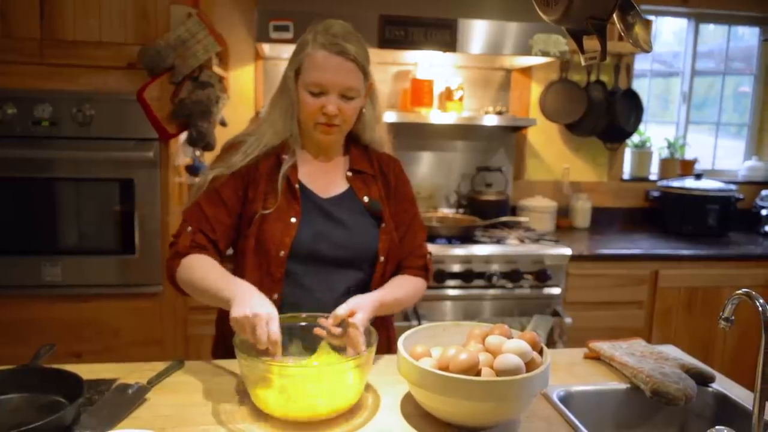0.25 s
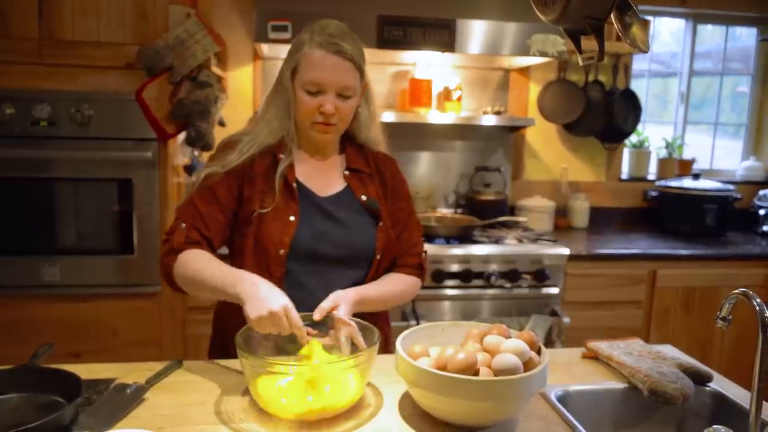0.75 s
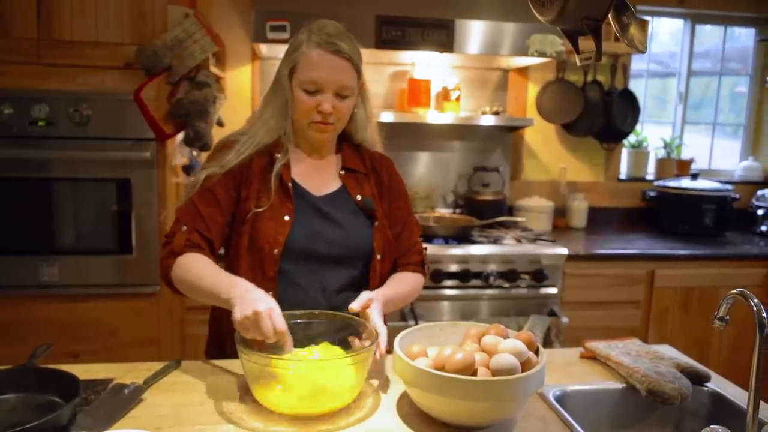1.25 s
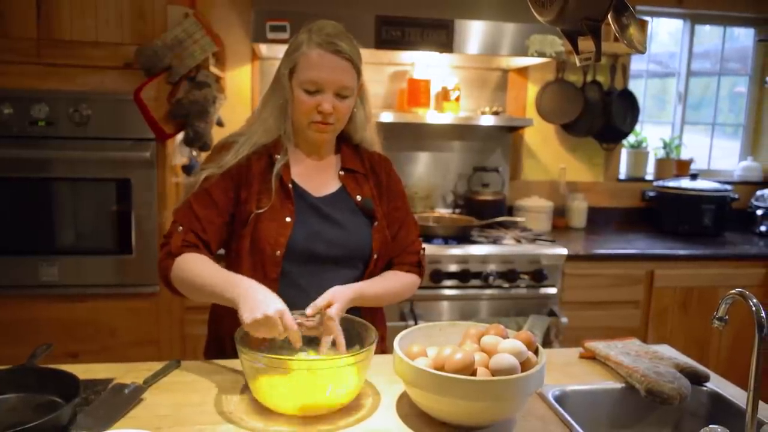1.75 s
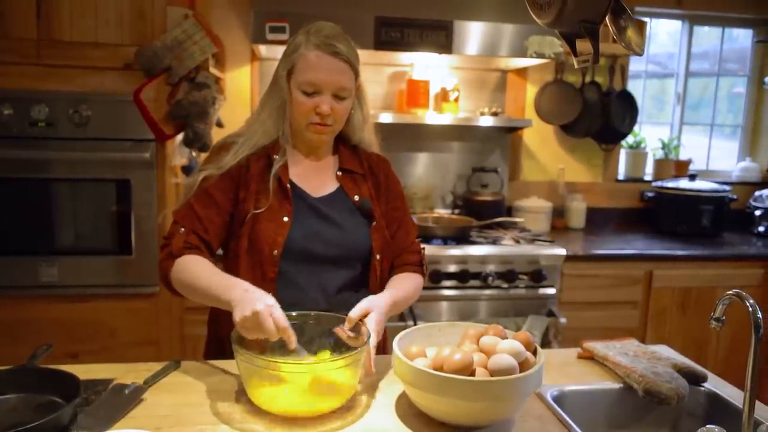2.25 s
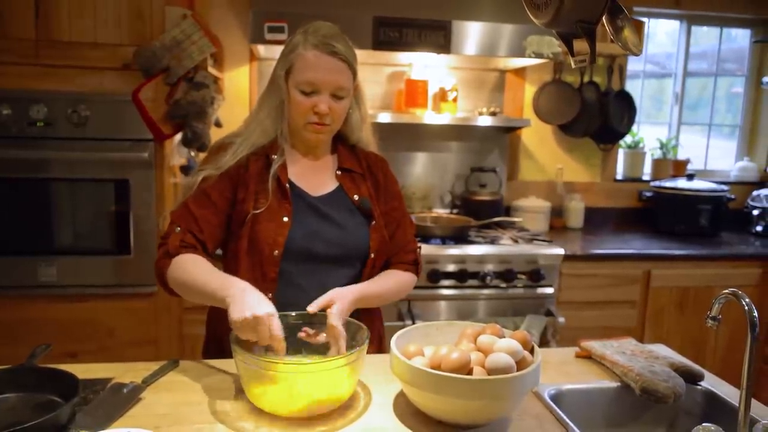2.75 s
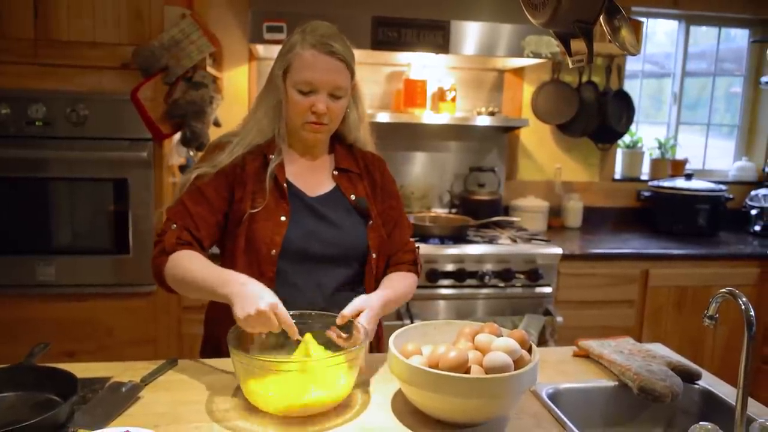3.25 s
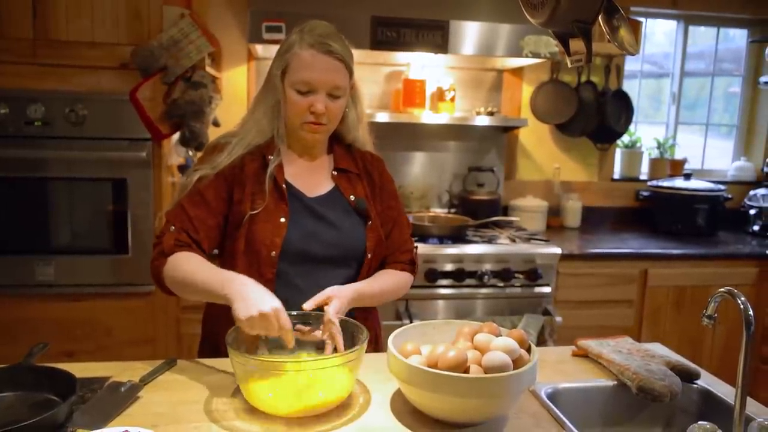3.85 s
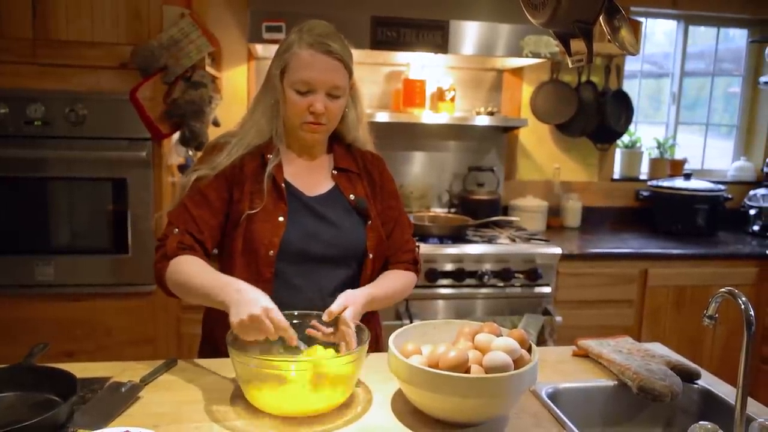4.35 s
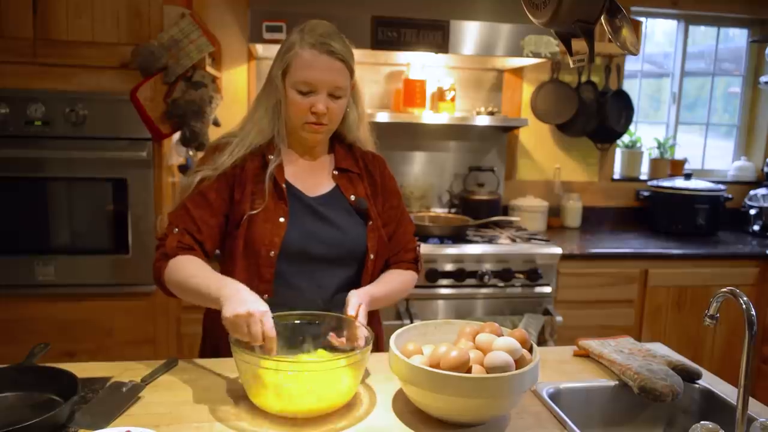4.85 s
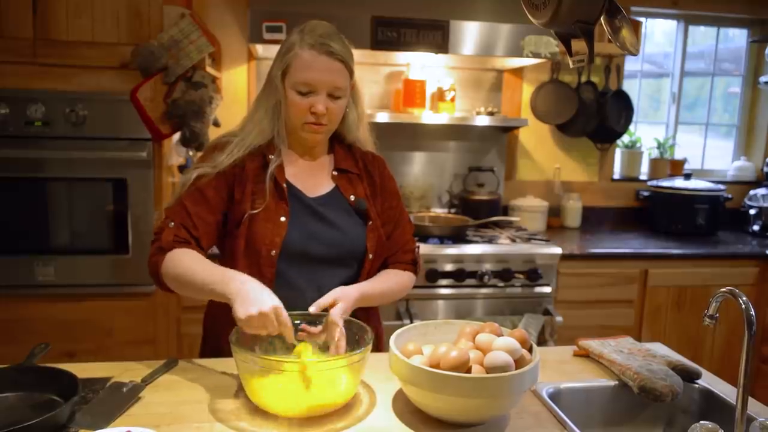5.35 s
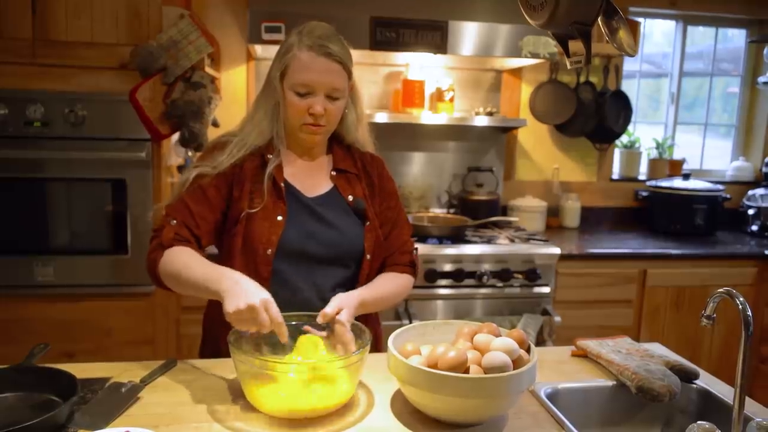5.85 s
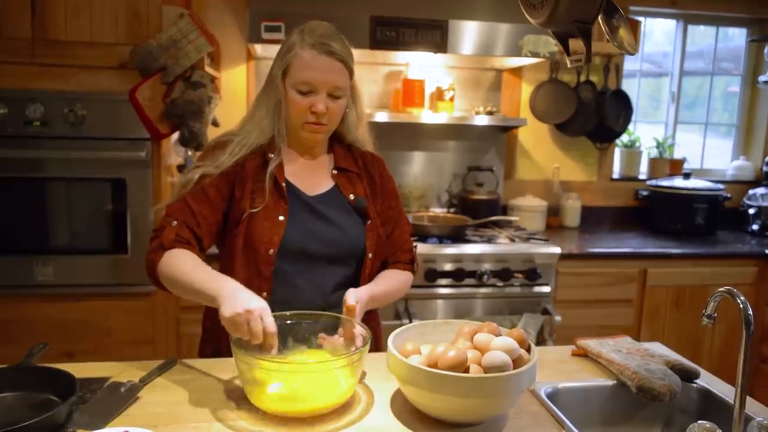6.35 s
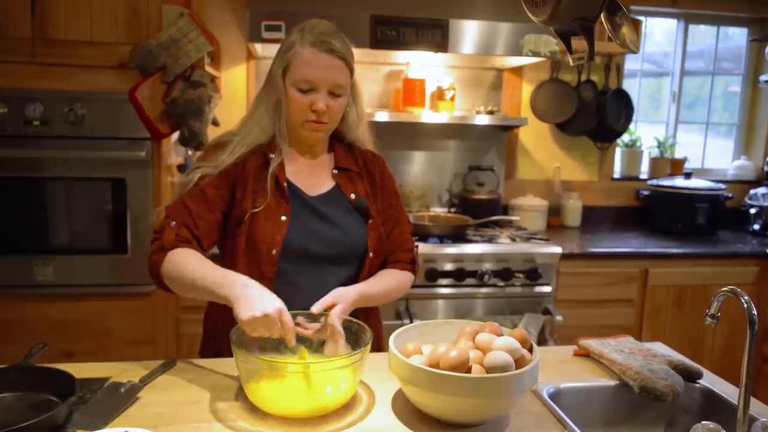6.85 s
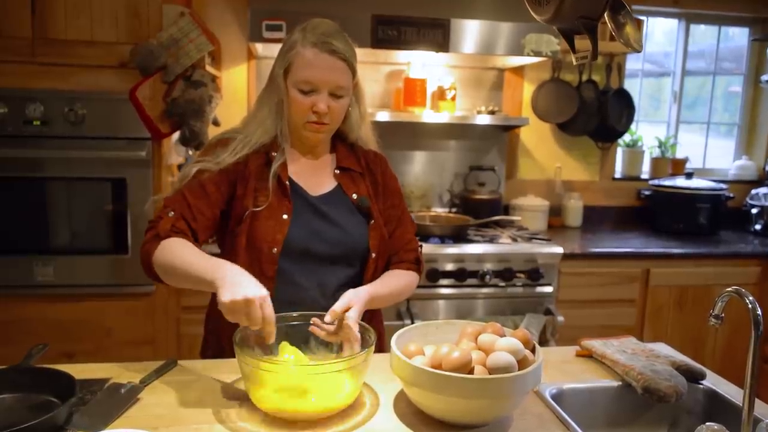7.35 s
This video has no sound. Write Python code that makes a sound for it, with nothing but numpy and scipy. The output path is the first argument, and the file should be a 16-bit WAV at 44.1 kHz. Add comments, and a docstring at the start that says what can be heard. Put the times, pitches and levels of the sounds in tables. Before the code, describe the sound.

Brisk whisking of eggs with a fork: bright ragged clicks on glass, dull knocks and squelching bubbles in a small quiet kitchen.

```python
"""The sound opens mid-beating, on the fading ring and slosh of a stroke just past; then a fork beats raw eggs
in a glass bowl, nearly five strokes a second, each a ragged rake, a click on the glass and a duller knock
through the egg. Impacts and slips excite damped modes of the bowl; the plops, squelches, gulps and gurgle of
the egg are dying bubble tones, some with bursts of noise. Echoes in the bowl and a small kitchen answer over
quiet air."""
import sys
import numpy as np
from scipy import signal
from scipy.io import wavfile
from scipy.ndimage import uniform_filter1d

SR = 44100
rng = np.random.default_rng(int(sys.argv[2]) if len(sys.argv) > 2 else 0)


def wav_record(signal):
    """Record a signal, one row per channel, as 16-bit PCM in the file named by sys.argv[1]."""
    frames = np.transpose(np.atleast_2d(signal))
    bounded = np.clip(frames, -1, 1)
    # unit amplitude maps onto the largest positive 16-bit level
    quanta = np.round(bounded * 32767).astype(np.int16)
    wavfile.write(sys.argv[1], SR, quanta)


N = 334719

# Event levels are relative: the source functions and the scene apply further gains.
# Turns of the fork: (time of click [s], click level [dB], level of its wet body [dB],
#                     delay of knock after click [s], knock level [dB])
STROKES = [(0.1265, -14.5, -26, 0.069, -21), (0.337, -17.5, -23, 0.066, -24.5),
           (0.52, -12.5, -24, 0.12, -30), (0.7503, -15, -24, 0.066, -20), (0.961, -17, -30, 0.073, -29),
           (1.137, -10.5, -27.5, 0.12, -33), (1.3815, -11, -33, 0.053, -21.5),
           (1.586, -26, -28, 0.064, -30), (1.79, -19.5, -28, 0.056, -26.5),
           (1.9756, -17.5, -26.5, 0.071, -26.5), (2.183, -16.5, -24.5, 0.07, -22.5),
           (2.398, -17, -20.5, 0.087, -32), (2.601, -20, -32, 0.072, -29.5),
           (2.817, -22, -33, 0.076, -39.5), (3.028, -24, -22, 0.069, -23.5), (3.2419, -15, -27, 0.052, -30),
           (3.455, -14, -27.5, 0.073, -23.5), (3.651, -10.5, -24, 0.084, -23),
           (3.886, -18, -30.5, 0.069, -18), (4.068, -16.5, -25, 0.097, -24), (4.295, -29, -23, 0.073, -26),
           (4.498, -18, -22.5, 0.084, -23), (4.7042, -18, -63, 0.026, -36.5),
           (4.9429, -16.5, -24.5, 0.077, -20.5), (5.129, -22, -34.5, 0.104, -21),
           (5.374, -13.5, -23, 0.068, -19.5), (5.579, -14.5, -27, 0.066, -21),
           (5.7867, -14.5, -27, 0.018, -37), (6.021, -12.5, -30.5, 0.026, -44),
           (6.244, -13, -22, 0.072, -20.5), (6.466, -16, -30, 0.073, -29), (6.6811, -16, -25.5, 0.061, -18),
           (6.889, -13.5, -31, 0.06, -18.5), (7.0881, -18.5, -22.5, 0.072, -26.5),
           (7.2845, -14.5, -29.5, 0.011, -44), (7.494, -15, -24.5, 0.064, -29)]
# Tines glancing off the glass between blows: (time [s], level [dB])
GRAZES = [(0.0, -28.5), (0.507, -15), (1.368, -25.5), (2.788, -25), (3.218, -21.5), (4.277, -14),
          (4.479, -14.5), (5.159, -17.5), (5.318, -30), (5.528, -23)]
# Single modes of the glass left singing: (time [s], level [dB], pitch [Hz])
RINGS = [(0.0, -36.5, 1068), (0.812, -33, 7420), (1.031, -32, 4940), (2.044, -29.5, 1100),
         (2.482, -33.5, 2280), (3.953, -31, 4909), (5.018, -29, 4600), (5.644, -31, 4909),
         (7.161, -35, 2217)]
# Modes of fork and egg-filled glass together: (frequency [Hz], bandwidth [Hz], strength [dB])
BOWL_MODES = [(1130, 124, 17), (2152, 68, 14.5), (3063, 450, 5), (4753, 64, 3.5), (5604, 304, 11.5),
              (6340, 38, 5), (7520, 20.5, 11.5), (8260, 160, 0), (11774, 1000, 13.5), (12600, 590, 6.5),
              (14940, 680, 8)]
# Air pockets popping open behind the fork: (time [s], level [dB], starting pitch [Hz],
#                                            snap of the film relative to the tone [dB])
PLOPS = [(0.103, -26.5, 635, 0.5), (0.326, -22.5, 836, -16), (0.9497, -16, 553, -3.5),
         (1.569, -18, 509, -10), (1.769, -19, 390, -16), (1.969, -23.5, 332, -4), (2.171, -18.5, 531, -15),
         (2.386, -22.5, 670, -6), (2.592, -9, 596, -14), (3.014, -19.5, 493, -15), (3.227, -23, 1060, -1),
         (3.439, -18.5, 503, -8.5), (3.65, -24.5, 857, -30), (3.873, -21, 523, 4), (4.078, -19, 450, -11),
         (4.287, -23, 500, -10), (4.328, -25, 516, -28), (4.496, -19.5, 450, -12), (5.528, -28, 657, 3),
         (6.426, -23, 553, -30), (6.873, -23.5, 882, 0), (7.079, -16.5, 611, -19)]
# Egg torn by the tines, bubbles bursting: (time [s], level [dB], pitch of the first bubble [Hz])
SQUELCHES = [(0.558, -26.5, 1900), (0.726, -24.5, 1360), (0.751, -15, 1416), (0.793, -20, 860),
             (1.178, -17.5, 1640), (1.384, -16.5, 1465), (1.433, -21, 1206), (1.976, -17, 1065),
             (2.187, -20, 1390), (3.429, -24.5, 1200), (4.298, -19, 1560), (4.916, -22.5, 2050),
             (5.106, -25, 1130), (5.315, -25, 1110), (5.344, -20, 1350), (5.534, -26, 1800),
             (5.735, -29.5, 1380), (5.792, -25, 1435), (5.965, -29, 1590), (6.718, -23.5, 1286),
             (7.313, -28, 1760), (7.413, -20.5, 1690)]
# The mass of egg heaving in the bowl: (time [s], level [dB], central pitch [Hz])
SLOSHES = [(0.0, -36, 560), (0.344, -25, 317), (0.858, -23.5, 305), (1.147, -24.5, 457),
           (1.467, -18.5, 383), (1.495, -24.5, 280), (2.263, -28.5, 351), (3.25, -31, 316),
           (4.763, -34, 270), (5.525, -29, 324), (5.825, -28, 279), (6.04, -28, 420), (6.087, -21, 284),
           (6.961, -26.5, 297)]
# Large bubbles swelling under the surface: (time [s], level [dB], starting pitch [Hz])
GLUGS = [(0.68, -24.5, 521), (1.366, -22.5, 487), (1.803, -29.5, 541), (2.937, -38, 528),
         (3.599, -28.5, 583), (4.702, -30.5, 516), (5.94, -30, 570), (7.407, -19.5, 473)]
# Decay of the kitchen's reverberation: (frequency [Hz], time to fall 60 dB [s])
KITCHEN_DECAY = [(150, 1), (600, 0.38), (5200, 0.45), (15000, 0.29)]
# Spectrum of the quiet air: (frequency [Hz], relative level [dB])
AIR_SPECTRUM = [(20, 17), (60, 24.5), (250, 19.5), (16000, -16)]

T = np.arange(SR // 8) / SR  # time within one event (s)
EDGE_HZ = 15800  # upper limit of the sound
WALL_LOW_HZ = 880  # the wall hardly sounds below this pitch
POOL_HZ = 290.3  # lowest pitch of the pool of egg when a knock pushes it
RAKE_LEAD_S, RAKE_SWELL_S = 0.05, 0.026  # head start of the rake on its click, time constant of its swell
SPOT_DB = 2.5  # standard deviation of a mode's strength with the spot struck


def beating():
    """Periodic excitation: every turn of the fork gives a rake, a click and a later knock."""
    mix = np.zeros(N + SR)
    for click_s, click_db, wet_db, knock_delay, knock_db in STROKES:
        contacts = [
            (-RAKE_LEAD_S, click_db - 17.5, rake()),
            (0, click_db, click(wet_db - click_db)),
            (knock_delay, knock_db, knock()),
        ]
        for delay, db, sound in contacts:
            start = max(round((click_s + delay) * SR), 0)
            mix[start:start + len(T)] += amp(db) * hollow(sound)
    return mix[:N]


def click(body_db, contact=0.0016, dry_db=-12, skid_db=-1, skid_s=0.0034, froth_db=-4):
    """Impact excitation: a short noise burst and a ragged skid drive the glass and squeeze out froth."""
    chatter = crest(rng.standard_normal(len(T)) * T * np.exp(-(T / contact) ** 2))
    skid = crest(droplets(per_s=1100, spread_db=7) * np.exp(-T / skid_s))
    push = chatter + amp(skid_db) * skid
    low, _ = glass(skid, ring_db=-60)
    wall = crest(band(low, WALL_LOW_HZ, EDGE_HZ))
    wet = amp(skid_db) * wall + amp(froth_db) * squelch(rng.uniform(1120, 2000))
    _, high = glass(push, ring_db=-54)
    contact_sound = crest(high + amp(dry_db) * band(push, WALL_LOW_HZ, EDGE_HZ))
    return contact_sound + amp(body_db) * wet


def knock(length=0.0065, tone_db=-9, pool_db=-13, gulp_db=-15):
    """Cushioned impact: egg lengthens the contact, which rings the wall and pushes the pool."""
    landing = droplets(per_s=5000, spread_db=-5.5)
    landing *= (1 - np.exp(-T / 0.00033)) * np.exp(-(T / length) ** 2)
    body, tink = glass(landing, ring_db=-38)
    wall = crest(body + amp(tone_db) * crest(singing(rng.uniform(950, 1190))))
    pool = bubble(POOL_HZ * rng.uniform(1, 1.146), t60=0.057, rise=0.0045, glide=0)
    return amp(-1) * wall + amp(-1.5) * tink + amp(pool_db) * pool + amp(gulp_db) * blips(POOL_HZ)


def rake(per_s=600, spread_db=5, wall_db=-13, treble_db=-5, trail=0.67):
    """Stick-slip: small ticks swell up to the blow and trail off as the tines catch on the glass."""
    since = T - RAKE_LEAD_S
    swell = np.exp(np.minimum(since, -since / trail) / RAKE_SWELL_S)
    low, high = glass(droplets(per_s, spread_db) * swell, ring_db=-59)
    wall = crest(band(low, WALL_LOW_HZ, EDGE_HZ))
    return amp(wall_db) * wall + amp(treble_db) * high


def graze(contact=0.0021, wall_db=-12):
    """Glancing contact: brief skips over the glass stir mostly its high modes."""
    skips = droplets(per_s=6800, spread_db=1) * np.exp(-T / contact)
    low, high = glass(skips, ring_db=-72)
    return hollow(high + amp(wall_db) * low)


def singing(hz, t60=0.2, bloom_db=16, bloom_s=0.0027):
    """Free vibration: one mode of the glass blooms under the tines and rings on after they leave."""
    held = np.exp(-T / bloom_s)
    fade = np.minimum(10 * (1 - T / T[-1]), 1)  # closes the event without a step
    envelope = (1 - held) * (amp(bloom_db) * held + amp(-60 * T / t60)) * fade
    return np.sin(2 * np.pi * hz * T) * envelope


def glass(push, ring_db, ring_t60=0.3, split_hz=5100):
    """Modal superposition: low and high modes under a push, varied by the spot struck and the moving egg."""
    modes = np.zeros((2, len(T)))
    for hz, width, db in BOWL_MODES:
        lingering = amp(ring_db + 2 * SPOT_DB * rng.standard_normal() - 60 * T / ring_t60)
        decay = np.exp(-np.pi * width * T) + lingering
        tone = np.cos(2 * np.pi * hz * rng.normal(1, 0.00913) * T) * decay
        # the factor width offsets the greater length of narrow modes
        modes[int(hz > split_hz)] += width * amp(db + SPOT_DB * rng.standard_normal()) * tone
    return [crest(signal.fftconvolve(push, part)[:len(T)]) for part in modes]


def hollow(x, echo_db=-5, longest_s=0.0022, count=4):
    """Multiple reflection: dulled echoes inside the bowl take other paths for each spot touched."""
    paths = np.zeros(SR // 200)
    delay, sign = rng.random((2, count))
    at = np.clip((delay * longest_s * SR).astype(int), 8, len(paths) - 1)
    paths[at] = amp(echo_db) * np.sign(sign - 0.5)
    paths = np.convolve(paths, [0.2, 0.6, 0.2], "same")  # the egg dulls the echoes
    paths[0] = 1  # direct sound
    return signal.fftconvolve(x, paths / np.linalg.norm(paths))[:len(x)]


def plop(hz, snap_db, ring=0.021):
    """Cavity resonance: a film of egg snaps and the opened hollow rings, rising as it closes."""
    cavity = bubble(hz, t60=ring, rise=0.0051, glide=rng.exponential(0.11))
    return 2 * (cavity + amp(snap_db) * snap())


def snap(contact=0.002):
    """Film rupture: a stretched film of egg breaks in a short burst of band-limited noise."""
    burst = rng.standard_normal(len(T)) * T * np.exp(-(T / contact) ** 2)
    return crest(band(burst, 610, 4130))


def squelch(hz, spread=0.014, scatter=0.303, count=8):
    """Bubble cascade: one bubble bursts and sets off a cluster of others, mostly weaker, with a fizz."""
    froth = bubble(hz, t60=0.014, rise=0.0054, glide=0.035)
    delays = rng.exponential(spread, count)
    pitches = hz * np.exp(rng.normal(0, scatter, count))
    for delay, pitch, size in zip(delays, pitches, rng.random(count)):
        pop = size ** 2 * bubble(pitch, t60=0.012, rise=0.00017, glide=0.26, length=len(T) // 4)
        froth = froth + np.pad(pop, (round(delay * SR), len(T)))[:len(T)]
    fizz = droplets(per_s=1200, spread_db=10) * np.sqrt(T) * np.exp(-2 * T / spread)
    return crest(froth) + amp(-11) * crest(band(fizz, hz, 9600))


def churn(offset_db=-25, range_db=18, cycles=11, count=55, lead=0.028, spread=0.022,
          middle_hz=1550, scatter=0.505):
    """Bubble ensemble: a dense gurgle in each stroke, stronger when the fork runs deep in the egg."""
    clicks_s, _, wet_db = np.repeat(np.array(STROKES)[:, :3], count, axis=0).T
    s = np.minimum(clicks_s - lead + rng.gamma(2, spread, len(clicks_s)), N / SR)
    db = offset_db + wet_db + range_db * rng.random(len(clicks_s)) ** 3
    hz = middle_hz * np.exp(rng.normal(0, scatter, len(clicks_s)))

    def short_bubble(pitch):
        """Constant relative damping: every bubble dies within the same number of cycles."""
        return bubble(pitch, t60=cycles / pitch, rise=1 / pitch, glide=0.045, length=len(T) // 4)

    return play(short_bubble, np.transpose([s, db, hz]))


def blips(hz, spread=0.0092, scatter=0.16, ring=0.052, upper_db=-7, count=4):
    """Entrained air: egg falls back in short gulps of rising pitch; each sheds a smaller bubble."""
    delays = np.cumsum(rng.exponential(spread, count))
    gulps = np.zeros(len(T))
    for order, delay in enumerate(delays - delays[0]):
        pitches = hz * np.array([1, 2]) * np.exp(rng.normal(0, scatter, 2))
        large, small = (bubble(f, t60=ring * hz / f, rise=0.0016, glide=0.42) for f in pitches)
        gulp = large + amp(upper_db) * small
        gulps += np.pad(gulp, (round(delay * SR), 0))[:len(T)] / np.sqrt(order + 1)
    return crest(gulps)


def glug(hz):
    """Large-bubble resonance: a soft, rounded note that bends upward."""
    return bubble(hz, t60=0.082, rise=0.013, glide=0.42)


def bubble(hz, t60, rise, glide, length=len(T)):
    """Bubble resonance: a dying tone whose pitch climbs by the share glide as air nears the surface."""
    t = T[:length]
    turns = np.cumsum(hz * (1 + glide * np.tanh(t / t60))) / SR
    envelope = (1 - np.exp(-t / rise)) * amp(-60 * t / t60)
    return crest(np.sin(2 * np.pi * turns) * envelope)


def kitchen(x, wet_db=-6, size=256, count=6):
    """Room reverberation: early echoes of counter and cupboards, a short tail, paths shifting with the arm."""
    t = np.arange(SR // 2) / SR
    early = 1 + 3.6 * np.exp(-t / 0.012)
    taps = rng.standard_normal((count, len(t))) * (t > 0.003) * early
    hz, at, z = signal.stft(taps, SR, nperseg=size)
    decay = amp(-60 * at / read(KITCHEN_DECAY, hz)[:, None])
    tails = signal.istft(z * decay, SR, nperseg=size)[1]
    tails *= amp(wet_db) / np.linalg.norm(tails[0])
    # slowly turning shares of the sound go to each tail
    shares = np.cos(np.outer(np.arange(count) + 1, np.arange(N) / SR) * 2)
    shares /= np.linalg.norm(shares, axis=0)
    return x + signal.oaconvolve(x * shares, tails, axes=1).sum(0)[:N]


def hush(level_db=-72.5):
    """Stationary noise: the quiet air of the room is random pressure with a fixed spectrum."""
    air = colour(rng.standard_normal(N), AIR_SPECTRUM)
    return amp(level_db) * air / air.std()


def droplets(per_s, spread_db):
    """Random impulse process: sparse impacts of uneven size and random sign."""
    size = amp(spread_db * np.minimum(rng.exponential(1, len(T)), 3))
    return size * rng.choice([-1, 1], len(T)) * (rng.random(len(T)) < per_s / SR)


def play(source, rows):
    """Linear superposition: sounds the source once for each row (time [s], level [dB], settings)."""
    mix = np.zeros(N + 2 * len(T))
    for s, db, *settings in rows:
        start = max(round(s * SR), 0)
        sound = source(*settings)
        mix[start:start + len(sound)] += amp(db) * sound
    return mix[:N]


def band(x, low_hz, high_hz):
    """Band-pass filtering: keeps the part of a sound between two pitches."""
    return signal.sosfilt(signal.butter(2, [low_hz, high_hz], "bandpass", fs=SR, output="sos"), x)


def colour(x, points, size=2048):
    """Minimum-phase filtering: a causal response with the given spectrum."""
    log_gain = np.log(amp(read(points, abs(np.fft.fftfreq(size, 1 / SR)))))
    taps = np.fft.ifft(np.exp(np.conj(signal.hilbert(log_gain)))).real
    return signal.fftconvolve(x, taps)[:len(x)]


def read(points, hz):
    """Interpolation: joins the points by straight lines on a log-frequency axis."""
    f, value = np.transpose(points)
    return np.interp(np.log(hz + 1), np.log(f + 1), value)


def crest(x, size=100):
    """Short-time power: scales a sound so that its loudest moment has rms 1."""
    return x / np.sqrt(uniform_filter1d(x ** 2, size).max() + 1e-20)


def amp(db):
    """Decibel law: amplitude ratio of a level."""
    return 10 ** (np.asarray(db) / 20)


def scene():
    """Radiation: fork and egg sound with little deep bass, in a kitchen with quiet air."""
    fork = beating() + play(graze, GRAZES) + play(singing, RINGS)
    egg = play(plop, PLOPS) + play(squelch, SQUELCHES) + churn() + play(blips, SLOSHES) + play(glug, GLUGS)
    radiation = signal.butter(3, 180, "highpass", fs=SR, output="sos")
    bowl = signal.sosfilt(radiation, fork + egg)
    return (amp(-10.5) * kitchen(bowl) + hush())[None]


def record(dry):
    """Low-pass filtering: the treble ends steeply around EDGE_HZ."""
    taps = signal.firwin(255, EDGE_HZ, window=("kaiser", 8), fs=SR)
    return signal.oaconvolve(dry, taps[None], "same")


dry = scene()
out = record(dry)
wav_record(out)
```